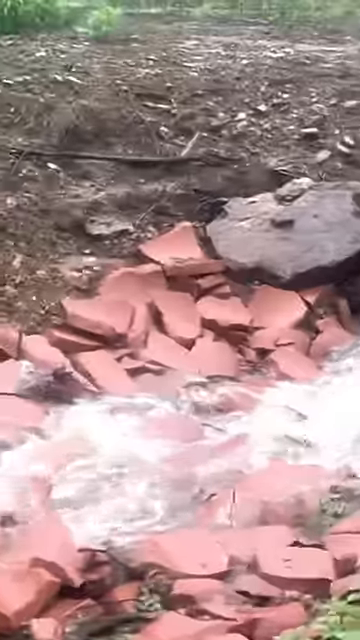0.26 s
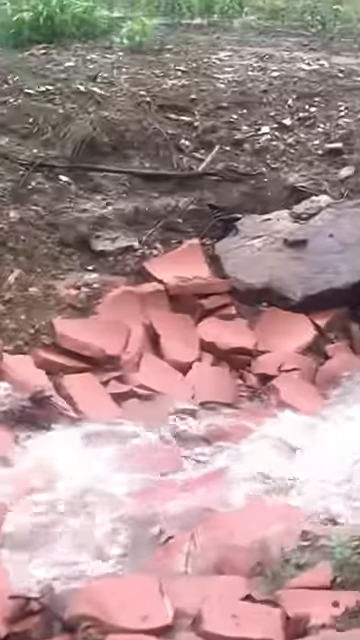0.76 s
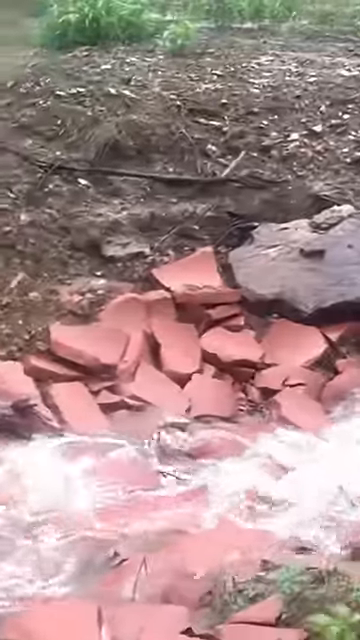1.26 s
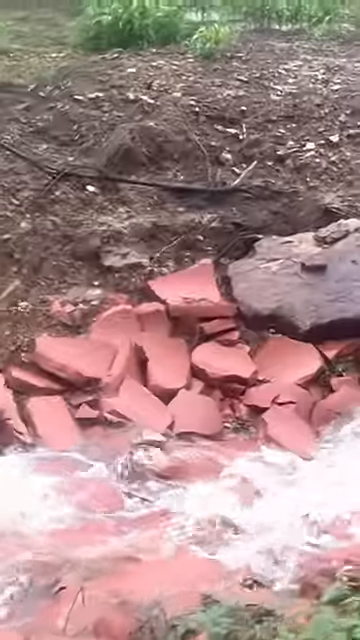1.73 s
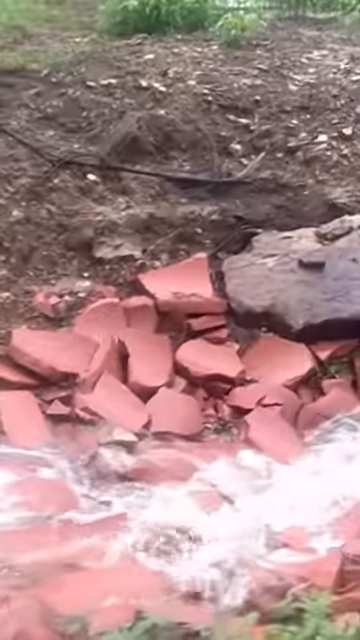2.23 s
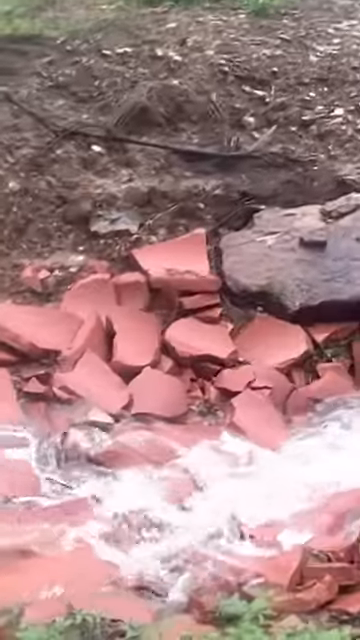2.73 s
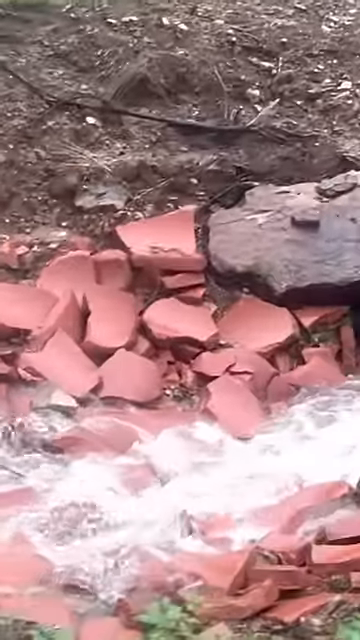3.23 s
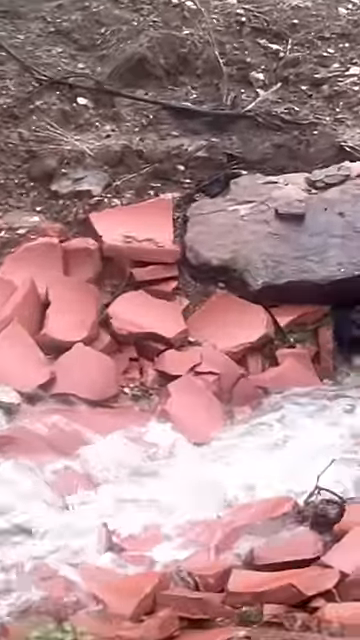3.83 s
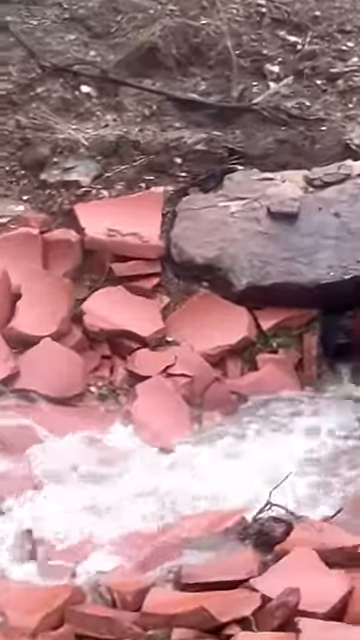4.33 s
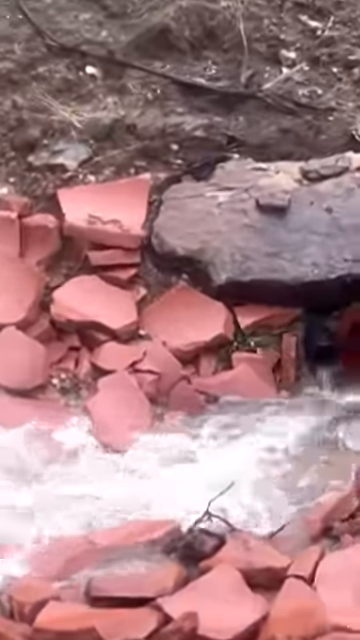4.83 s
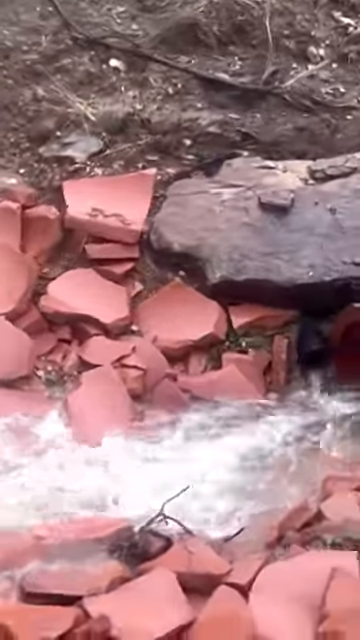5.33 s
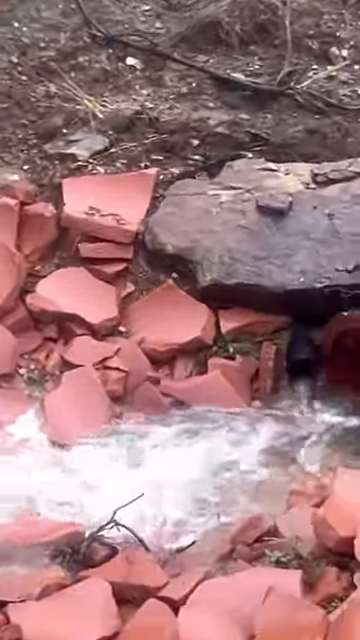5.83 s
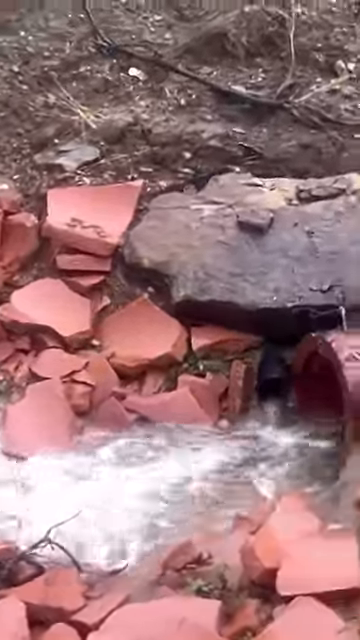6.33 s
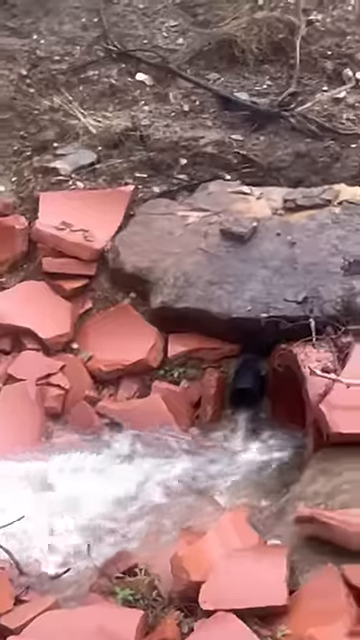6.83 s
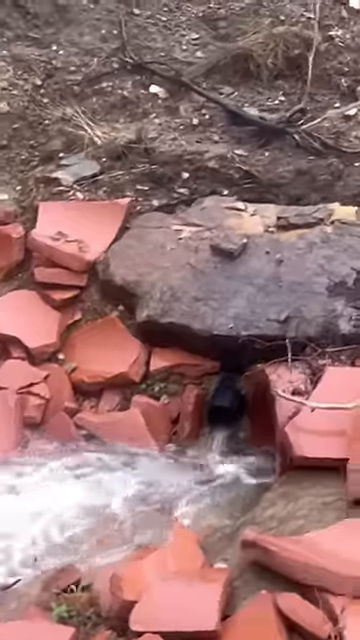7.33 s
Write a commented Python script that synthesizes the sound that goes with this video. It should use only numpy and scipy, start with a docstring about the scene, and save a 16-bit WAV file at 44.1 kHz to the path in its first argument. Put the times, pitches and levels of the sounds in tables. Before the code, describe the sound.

Storm water rushes steadily from a drain pipe, foaming over broken tile and rock, with faint engine throb and low wind thumps near the end.

```python
"""Storm water from a drain pipe

Storm water gushes from a drain pipe and foams over broken tile and rock, near a hand-held camera that turns.
The water is thousands of tiny bubble pings over hiss; large bubbles and drops of spray ring out of it.
A far engine, made of low tones and clatter, throbs at a steady speed and fades.
Wind, made of low noise, rumbles in the two microphone ports, and gust blows thump them near the end."""
import sys
import numpy as np
from scipy import signal
from scipy.fft import rfft, irfft, next_fast_len
from scipy.io import wavfile
from scipy.ndimage import uniform_filter1d

SR = 44100
rng = np.random.default_rng(int(sys.argv[2]) if len(sys.argv) > 2 else 0)


def dump_mix(stems):
    """Bounce the given channels to the path in sys.argv[1] as a 16-bit WAV at rate SR."""
    frames = np.atleast_2d(stems).T  # one column per channel
    limited = np.clip(frames, -1, 1)  # hard clip at full scale
    pcm = np.round(limited * 32767).astype(np.int16)
    wavfile.write(sys.argv[1], SR, pcm)


def decibels_to_gain(level_db):
    """Convert a level in decibels to a linear amplitude gain (20 dB per decade)."""
    exponent = np.asarray(level_db, float) / 20
    return 10 ** exponent


N = 333727  # length in samples

# Loudness of the rush. Each row: time in seconds, level in dB.
RUSH_LEVEL = [(0, -37.5), (.7, -37.5), (1.4, -37), (2.1, -37), (2.8, -36.5), (3.5, -36), (4.2, -36),
              (4.8, -35.5), (5.5, -35.5), (6.2, -36), (6.9, -36.5), (7.57, -37.5)]
# Colour of the water in both ports. Each row: pitch in Hz, relative level in dB per Hz.
RUSH_COLOUR = [(60, -5.5), (190, -3), (260, -8), (400, -8.5), (650, -7.5), (1100, -9), (1350, -13),
               (1580, -10), (1800, -15), (2700, -16), (3500, -20.5), (4200, -22), (5500, -21.5),
               (6400, -25.5), (7200, -25.5), (10500, -26), (14000, -31.5), (15700, -39)]
# How the two ports hear the water. Each row: pitch in Hz, likeness from 0 to 1, lead of the left port
# in radians at turn 0, the same lead at turn 1, left over right in dB.
PORT_DIFFERENCES = [(203, 0.95, -0.5, 0.0, 0.8), (500, 0.85, 0.0, 0.02, 1), (1000, 1, 1.13, 0.57, -1),
                    (1410, 0.5, 0.5, 1.04, -3), (1710, 0.43, 2.5, 2.5, -1.5), (2140, 0.63, 1, 1, -0.3),
                    (2790, 0, 0, 1.0, 1.3), (3500, 1, -1.5, 1.6, 2), (4130, 0, 3, 1.5, -0.7),
                    (5000, 0, 0.2, 3.5, -4), (5440, 0.75, -4.5, 4.5, -8.5), (6200, 0.37, -2, 3.5, -5.5),
                    (6870, 0.72, -14, 9, -3)]
# The treble reaches one port later. One row: lowest pitch in Hz, pitch in Hz where the ports are in step,
# Hz per full turn of phase, likeness of the ports' sum and difference from 0 to 1.
TREBLE_DELAY = (6800, 7244, 5080, .7)
# How far the camera has turned: back a little at first, then steadily onward; the middle dulls with it.
# Each row: time in seconds, turn without unit.
CAMERA_TURN = [(0, 0.27), (1.5, 0.069), (4.5, 0.75), (7.57, 2.65)]
# Chosen short swells of the rush around one pitch. Each row: time in seconds, pitch in Hz, rise in dB.
CHOSEN_SWELLS = [(1.47, 2820, 5), (2.54, 2150, 7), (4.1, 1560, 5), (4.51, 2580, 6), (4.55, 704, 1),
                 (4.85, 780, 1.5), (5.32, 1550, 6), (5.42, 3700, 6), (7.0, 2800, 1)]
# Colour of the wind. Each row: pitch in Hz, relative level in dB per Hz.
WIND_COLOUR = [(25, -22), (50, 5.5), (90, 2.5), (150, -2), (300, -20), (600, -40)]
# Gusts over the breeze. Each row: time in seconds, peak in dB, length in seconds at half height,
# left over right in dB.
GUSTS = [(.68, -44, 0.26, -1), (1.8, -52, 0.13, -2), (2.17, -40.5, .3, 0), (2.65, -42.5, 0.42, 9),
         (3.42, -36.5, 0.48, 0.5), (3.965, -37, 0.24, 1), (4.572, -41.5, 0.45, 6), (5.118, -38.5, 0.25, 3),
         (5.6, -41, 0.34, 10.5), (6.08, -38.5, .35, -1), (6.453, -37, 0.27, 5), (7.202, -40, 0.17, -1),
         (7.5, -41, .2, 1)]
# Tones of the engine hum. Each row: multiple of the firing rate, relative level in dB.
ENGINE_TONES = [(3, -6.5), (4, -11), (5, -5), (6, -1.5), (7, -13), (8, -17.5)]
# Loudness of the engine before the tone and port offsets. Each row: time in seconds, level in dB.
ENGINE_LEVEL = [(0, -41), (2, -43), (4, -44), (6, -51.5), (7.57, -53)]
# Clatter of the three firings of a round, before random scatter. Each entry: relative level in dB.
FIRING_CLATTER = [-10.5, -2, 0]
# Ring of the engine block. One row: pitch in Hz, width in Hz, peak in dB at the start.
BLOCK_RING = (2670, 310, -45)
# Single large bubbles. Each row: time in seconds, peak in dB before panning, middle pitch in Hz.
BIG_BUBBLES = [(.086, -33, 4220), (.572, -38, 5080), (.604, -36, 2410), (0.699, -36, 445),
               (.884, -32, 1900), (1.833, -32.5, 533), (2.51, -28.5, 1080), (3.116, -32, 790),
               (3.193, -29.5, 342), (4.124, -31, 1490), (4.124, -30, 1040), (4.845, -26, 664),
               (4.9, -34, 686), (7.513, -39, 1710)]
# Snaps of spray. Each row: time in seconds, peak in dB, pitch in Hz, width in Hz,
# length in seconds at half height.
SPRAY_SNAPS = [(0.709, -32, 6200, 1500, .0012), (0.888, -39, 6940, 3000, .0015),
               (5.663, -26.5, 8600, 9100, 0.0068), (6.3736, -17, 7200, 300, 0.00058),
               (6.966, -28, 5400, 5000, 0.0036), (7.429, -32, 6800, 4000, .002)]
# Gust blows on the ports. Each row: time in seconds, rough peak in dB, middle pitch in Hz,
# length in seconds at half height, left over right in dB.
GUST_BLOWS = [(6.015, -18, 106, 0.011, -4), (6.040, -17, 72.5, 0.022, 0), (6.085, -17.5, 70, 0.019, -2),
              (6.106, -18.5, 101, 0.038, -1), (6.157, -18, 65.5, 0.037, -3.5), (6.215, -27, 94, 0.032, 3),
              (6.285, -31, 100, 0.018, 7), (6.338, -26, 76, .05, -2), (6.379, -18, 75, 0.021, 0),
              (6.46, -22, 90, 0.012, -2), (6.503, -25, 70, 0.0086, 7), (6.537, -24.5, 84.5, .016, -4),
              (6.568, -21, 70, 0.011, 0), (6.83, -26, 110, 0.02, 4), (6.851, -24.5, 70, 0.02, -4),
              (6.9, -29, 95, 0.015, 1)]

SIZE, HOP = 512, 128  # samples per spectrum frame, and from one frame to the next
SWELLS_PER_S, SWELL_DB = 6, 2.5  # further random swells: how many a second, mean rise
SWELL_S, SWELL_HZ = 0.027, 350  # half length and half width of every swell
SHADE_DB = -1  # change of the 2-4 kHz region per unit of turn
SPRAY_FOLLOWS = 0.2  # the treble swings this share more than the body
SLIDE = 0.037  # share by which the middle colour slides up per unit of turn
BREEZE_DB, BREEZE_GROWS_DB_PER_S = -53, 1.04  # level at the start, and its growth
OPPOSED = .5  # largest share of the other port's push that is taken away
ALIKE_HZ = 59.4  # below this pitch the wind pushes both ports alike
ENGINE_HZ = 22.35  # firings a second
FIRST_FIRING_S = .053
ENGINE_LAG_S = 0.00036  # the hum reaches the left port this much later
LOW_CUT_HZ = 40


def evened(x):
    """Scales to an rms of 1."""
    return x / np.sqrt(np.mean(abs(x) ** 2) + 1e-20)


def read(points, hz, axis=1):
    """Reads one column of a table between its rows, along log frequency."""
    table = np.transpose(points)
    return np.interp(np.log(hz + 1), np.log(table[0] + 1), table[axis])


def smooth_chance(shape, hz, axis=0):
    """Random wander of rms 1, mostly slower than hz, with one value a frame."""
    span = max(round(SR / HOP / hz), 1)
    once = uniform_filter1d(rng.standard_normal(shape), span, axis)
    return evened(uniform_filter1d(once, span, axis))


def left_right(level_db, pan_db):
    """Strength at the left and right port, pan_db apart."""
    return decibels_to_gain(level_db + np.array([.5, -.5]) * pan_db)


def foam(per_s=6000, spread_db=3.0, cycles=7, hiss=0.67, count=40):
    """Countless bubbles, each a short rising ping, over a hiss of finer ones; flat spectrum."""
    out = np.zeros(N)
    for hz in np.geomspace(250, 15000, count):
        t = np.arange(int(3 * cycles * SR / hz)) / SR
        ping = np.sin(2 * np.pi * hz * t * (1 + 0.046 * hz * t / cycles))
        ping *= np.exp(-t * hz * 2.37 / cycles)
        births = int(per_s / count * np.sqrt(hz / 2500) * N / SR)  # small bubbles are more numerous
        when, chance = rng.random((4000, 2))[:births].T
        strength = decibels_to_gain(spread_db * np.minimum(-np.log(chance + 1e-9), 5))
        at = (when * N).astype(int)[:, None] + np.arange(len(t))
        pings = np.bincount(at.ravel(), np.outer(strength, ping).ravel(), 2 * N)[:N]
        out += evened(pings) * np.sqrt(hz)
    bubbles = signal.stft(out, nperseg=SIZE, noverlap=SIZE - HOP)[2]
    bubbles /= np.sqrt(np.mean(abs(bubbles) ** 2, 1, keepdims=True)) + 1e-12
    fine = signal.stft(rng.standard_normal(N), nperseg=SIZE, noverlap=SIZE - HOP)[2]
    share = np.clip(hiss, 0, 1)
    return np.sqrt(1 - share) * bubbles + np.sqrt(share) * evened(fine)


def short_swells(t, hz):
    """Short swells of the rush around one pitch, chosen and random, in dB over time and frequency."""
    draw = rng.random((200, 3))[:int(SWELLS_PER_S * N / SR)]
    at_random = np.c_[draw[:, 0] * t[-1], 250 * 16 ** draw[:, 1], 2 * SWELL_DB * draw[:, 2]]
    at, at_hz, rise_db = np.r_[CHOSEN_SWELLS, at_random].T
    over_pitch = rise_db * np.exp(-((hz - at_hz) / SWELL_HZ) ** 2)
    over_time = np.exp(-((t - at[:, None]) / SWELL_S) ** 2)
    return over_pitch @ over_time


def ports(one, other, hz, turn):
    """Two foams become left and right: part alike below, a delayed pair in the treble."""
    first_lead = np.exp(-1j * read(PORT_DIFFERENCES, hz, axis=2))
    last_lead = np.exp(-1j * read(PORT_DIFFERENCES, hz, axis=3))
    lead = (1 - turn) * first_lead + turn * last_lead
    same = np.clip(read(PORT_DIFFERENCES, hz), 0, 1) * lead
    tilt = decibels_to_gain(read(PORT_DIFFERENCES, hz, axis=4) / 2)
    right = same * one + np.sqrt(1 - abs(same) ** 2) * other
    low = np.array([one * tilt, right / tilt])
    from_hz, step_hz, turn_hz, like = TREBLE_DELAY
    half = np.pi * np.minimum((hz - step_hz) / turn_hz, 1.5)  # half the phase lead of the left port
    like = np.clip(like, 0, 1)
    both = np.cos(half) * one
    apart = .9j * np.sin(half) * (like * one + np.sqrt(1 - like ** 2) * other)
    return np.where(hz > from_hz, np.array([both + apart, both - apart]), low)


def water(patch_db=0.94, lump_db=0.1, surge_db=0.16, splash_db=0.72):
    """Foam shaped by the rush, with drifting patches, slow surges and splashes that flash through the treble."""
    one, other = foam(), foam()
    hz = np.fft.rfftfreq(SIZE, 1 / SR)[:, None]
    t = np.arange(one.shape[1]) * HOP / SR
    body_db = np.interp(t, *np.transpose(RUSH_LEVEL))
    turn = np.interp(t, *np.transpose(CAMERA_TURN))
    treble = np.clip(np.log2(hz / 3000 + 1e-9), 0, 1)
    middle = np.clip(np.log2(hz / 1200 + 1e-9), 0, 1) - treble
    patches = evened(uniform_filter1d(smooth_chance(one.shape, 27, axis=1), 7, 0))
    lumps = evened(uniform_filter1d(smooth_chance(one.shape, 6.1, axis=1), 9, 0))  # slower, broader
    field_db = read(RUSH_COLOUR, hz / (1 + SLIDE * middle * turn))
    field_db += patch_db * patches + lump_db * lumps
    field_db += middle * SHADE_DB * turn
    field_db += treble * SPRAY_FOLLOWS * (body_db - body_db.mean())
    field_db += short_swells(t, hz)
    field_db += surge_db * smooth_chance(len(t), 3.2)
    field_db += splash_db * treble * smooth_chance(len(t), 110)
    z = ports(one, other, hz, np.clip(turn, 0, 1)) * decibels_to_gain(field_db)
    z /= np.sqrt(np.mean(np.sum(abs(z[:, 4:35]) ** 2, 1)))  # levels refer to the body, about 0.3-3 kHz
    return signal.istft(z * decibels_to_gain(body_db), nperseg=SIZE, noverlap=SIZE - HOP)[1][:, :N]


def wind(lump_db=3.5):
    """Lumpy low turbulence, a breeze with gusts, that partly pushes one port while it pulls the other."""
    t, size = np.arange(N) / SR, next_fast_len(N)
    hz = np.fft.rfftfreq(size, 1 / SR)
    noise = rfft(rng.standard_normal((2, size)))
    rumble = irfft(noise * decibels_to_gain(read(WIND_COLOUR, hz)), size)[:, :N]
    lumps = smooth_chance((2, N // HOP + 2), 15, axis=1).repeat(HOP, 1)[:, :N]
    rumble = rumble * decibels_to_gain(lump_db * uniform_filter1d(lumps, HOP, 1))
    share = OPPOSED * np.clip(np.log2(hz / ALIKE_HZ + 1e-9), -1, 1)
    crossed = irfft(rfft(rumble[::-1], size) * share, size)[:, :N]
    rumble = evened(rumble - crossed)
    force = decibels_to_gain(BREEZE_DB + BREEZE_GROWS_DB_PER_S * t) * np.ones((2, 1))
    for s, peak_db, length, pan_db in GUSTS:
        force = force + np.outer(left_right(peak_db, pan_db), .5 ** ((2 * (t - s) / length) ** 2))
    return rumble * force


def engine(waver_db=-2.15, uneven=0.072, scatter_db=7.0):
    """A far engine: low tones that pile up into thuds, every third stronger, and a clatter per firing."""
    t = np.arange(N) / SR
    turns = ENGINE_HZ * (t - FIRST_FIRING_S)  # counts firings
    heard = turns - ENGINE_HZ * ENGINE_LAG_S * np.array([[1], [0]])
    waver = smooth_chance((len(ENGINE_TONES), N // HOP + 2), 2.4, axis=1).repeat(HOP, 1)[:, :N]
    hum = np.zeros((2, N))
    for (multiple, db), drift in zip(ENGINE_TONES, waver):
        hum += decibels_to_gain(db + waver_db * drift) * np.cos(2 * np.pi * multiple * heard)
    hum *= np.sqrt(2) * (1 + uneven * np.cos(2 * np.pi * turns / len(FIRING_CLATTER)))
    level_db = np.interp(t, *np.transpose(ENGINE_LEVEL))
    fired = np.flatnonzero(np.diff(np.floor(turns + 0.039)))  # the clatter starts just ahead of the thud
    knocks = np.zeros(N)
    order = np.round(turns[fired]).astype(int) % len(FIRING_CLATTER)
    scatter = scatter_db * rng.standard_normal(400)[:len(fired)]
    knocks[fired] = decibels_to_gain(np.array(FIRING_CLATTER)[order] + scatter)
    knocks *= rng.choice([-1., 1.], N)  # each knock pushes or pulls at random
    hz, width_hz, peak_db = BLOCK_RING
    fade = np.pi * width_hz * t[:900]
    ring = np.sin(2 * np.pi * hz * t[:900]) * (np.exp(-fade / 3) - np.exp(-fade))
    clatter = signal.oaconvolve(knocks, ring / ring.max())[:N]
    clatter *= decibels_to_gain(peak_db + level_db - level_db[0])
    return hum * decibels_to_gain(level_db) * decibels_to_gain(np.array([[1.2], [-1.2]])) + clatter * decibels_to_gain(np.array([[0], [-6]]))


def gurgles(cycles=9, rise=0.079):
    """A large bubble rings a few cycles, rising in pitch as it nears the surface."""
    out = np.zeros((2, N))
    sides_db = rng.uniform(-7.0, 1.8, (len(BIG_BUBBLES), 1))  # added on the left, taken off on the right
    for (s, peak_db, hz), side_db in zip(BIG_BUBBLES, sides_db):
        reach = int(cycles * SR / hz)
        turns = np.arange(-reach, reach) * hz / SR
        ping = np.sin(2 * np.pi * turns * (1 + rise * turns / cycles))
        ping *= .5 ** ((3.8 * turns / cycles) ** 2)
        at = round(s * SR) - len(ping) // 2
        out[:, at:at + len(ping)] += left_right(peak_db, 2 * side_db)[:, None] * ping
    return out


def snaps(lag=0.000142, overtone_db=-22, tail_db=-14, tail_s=0.0038):
    """Drops that burst close by: a brief ring with an overtone and a faint tail, a little later on the left."""
    out = np.zeros((2, N))
    t = np.arange(-441, 441) / SR
    draws = rng.random((len(SPRAY_SNAPS), 60))  # 30 pitches and 30 phases a snap
    for (s, peak_db, hz, width_hz, length), draw in zip(SPRAY_SNAPS, draws):
        tones = (hz + width_hz * (draw[:30] - .5))[:, None]
        for side, late in enumerate((lag, 0)):
            since = t - late
            angle = 2 * np.pi * (tones * since + draw[30:, None])
            tail = decibels_to_gain(tail_db) * (t > late) * np.exp(-abs(since) / tail_s)
            shape = .5 ** ((2 * since / length) ** 2) + tail
            ring = (np.cos(angle) + decibels_to_gain(overtone_db) * np.cos(2 * angle)).sum(0) * shape
            at = round(s * SR) - 441
            out[side, at:at + len(t)] += decibels_to_gain(peak_db) * ring / abs(ring).max()
    return out


def thumps(lopsided=0.17, sag=.12):
    """Each gust blow swings both diaphragms for a few uneven cycles that slow down."""
    out = np.zeros((2, N))
    t = np.arange(-4410, 4410) / SR
    phases = rng.random((len(GUST_BLOWS), 1))
    for (s, peak_db, hz, length, pan_db), phase in zip(GUST_BLOWS, phases):
        slowing = 1 - sag * np.tanh(abs(t / length)) * np.sign(t) / 2
        angle = 2 * np.pi * (hz * t * slowing + phase)
        swing = np.cos(angle) - lopsided * np.cos(2 * angle)  # the inward push is sharper than the release
        swing *= .5 ** ((2 * t / length) ** 2)
        at = round(s * SR) - 4410
        out[:, at:at + len(t)] += np.outer(left_right(peak_db, pan_db), swing)
    return out


def scene():
    """Water, wind, engine, bubbles, spray and gust blows at the two ports."""
    return water() + wind() + engine() + gurgles() + snaps() + thumps()


def low_pass(x):
    """Removes everything above the highest recorded frequency."""
    return signal.sosfilt(signal.butter(12, 14280, fs=SR, output="sos"), x)


def record(dry):
    """The recorder's filter takes out the deepest rumble and finishes the mix."""
    low_cut = signal.butter(3, LOW_CUT_HZ, "high", fs=SR, output="sos")
    mix = signal.sosfiltfilt(low_cut, dry)
    return low_pass(mix)


dry = scene()
out = record(dry)
dump_mix(out)
```